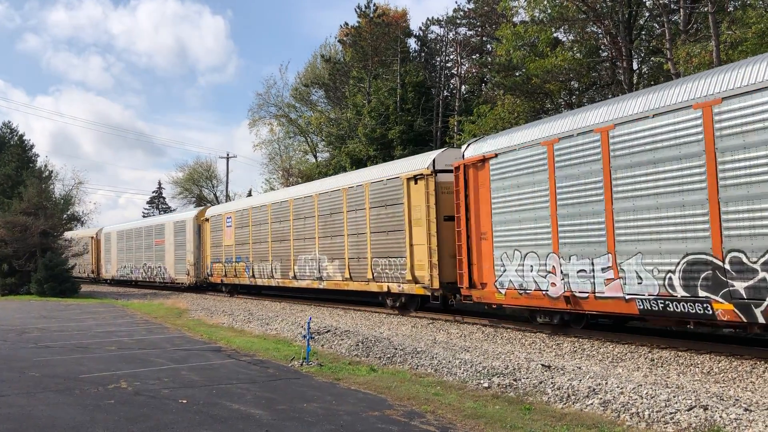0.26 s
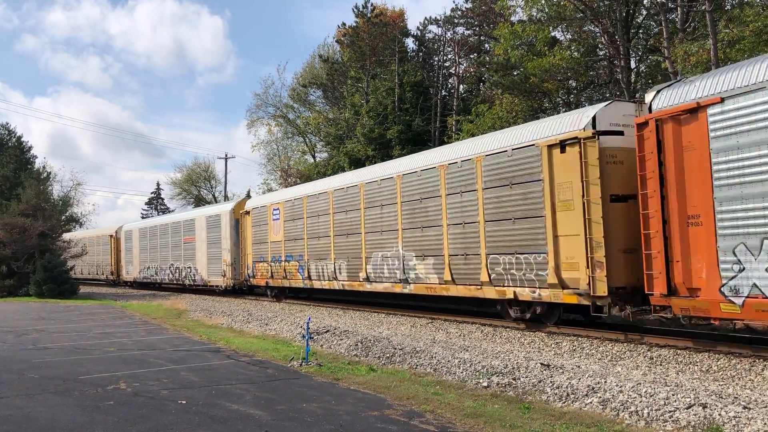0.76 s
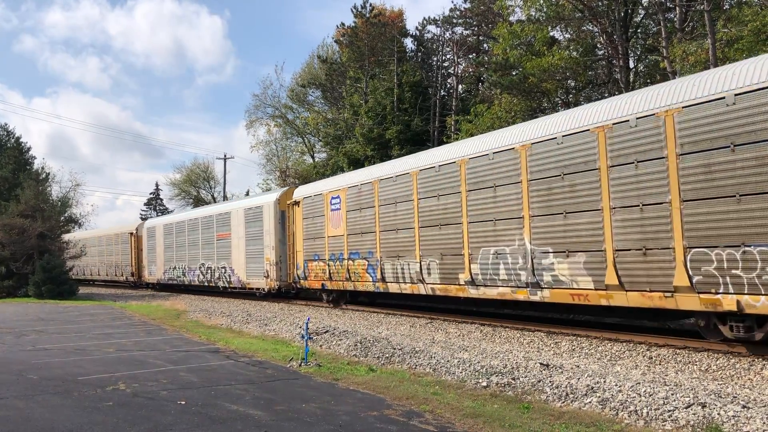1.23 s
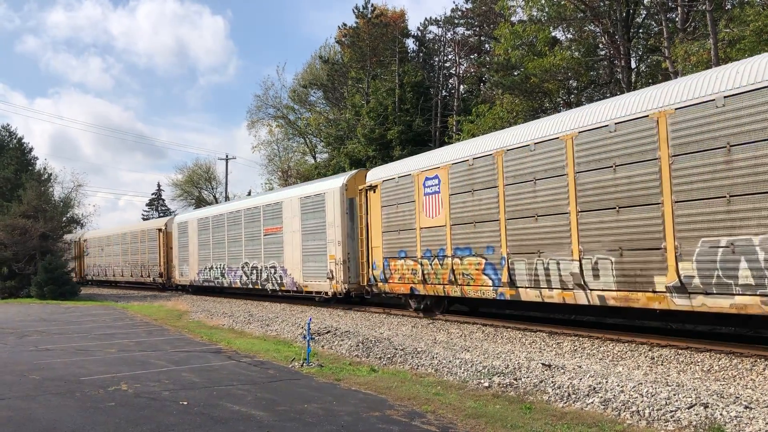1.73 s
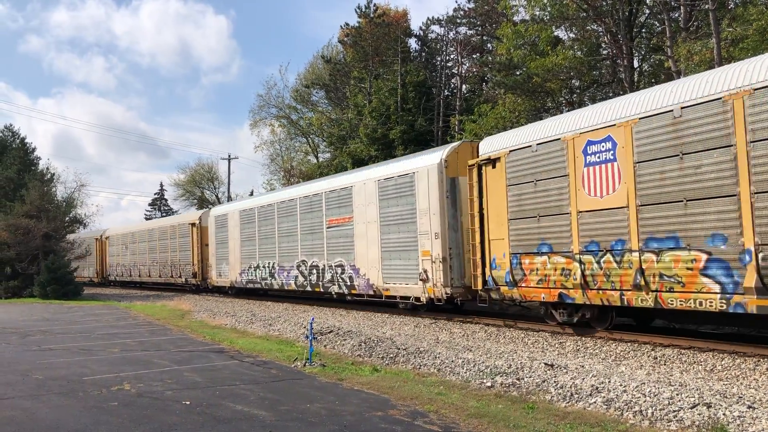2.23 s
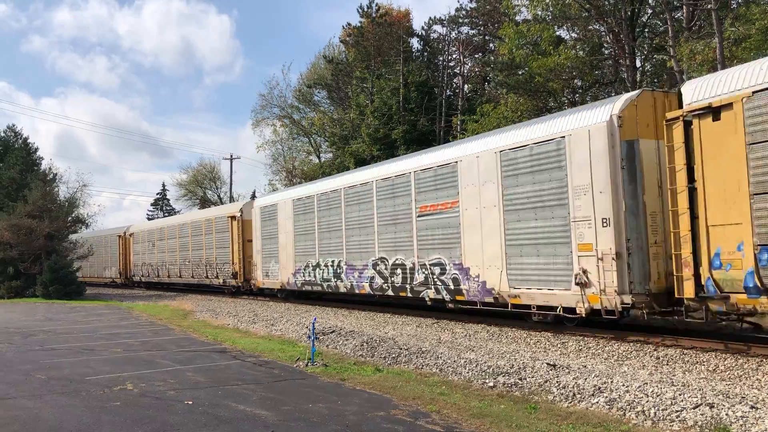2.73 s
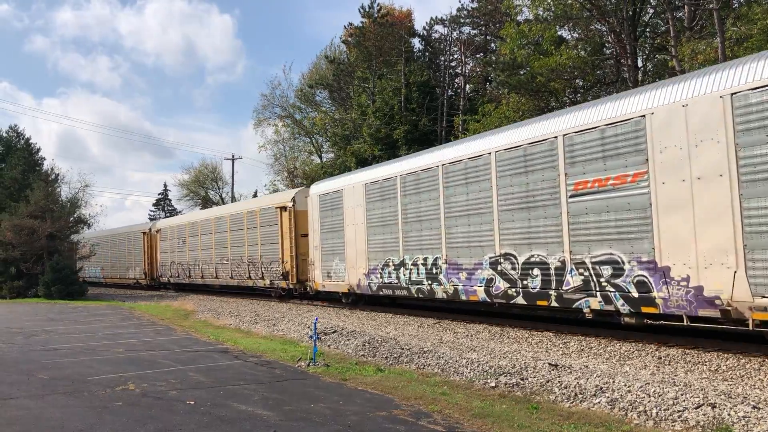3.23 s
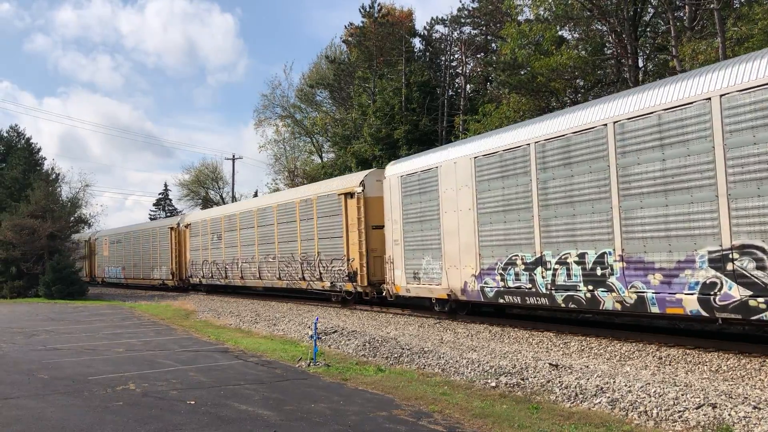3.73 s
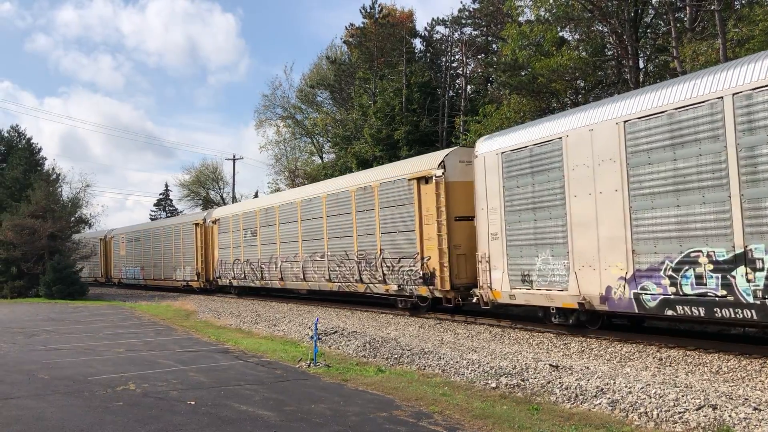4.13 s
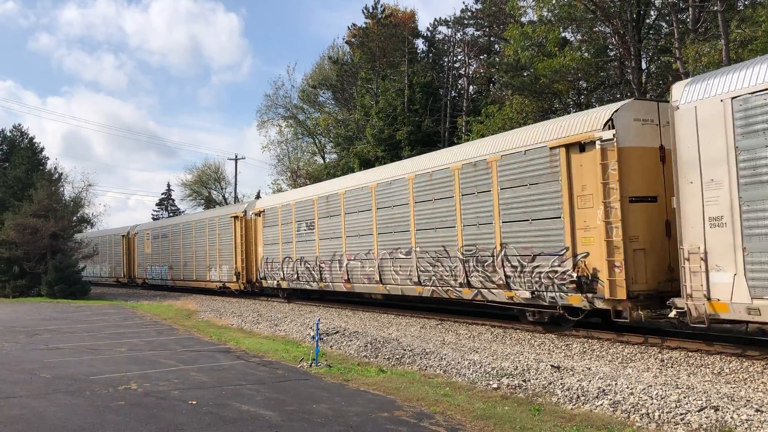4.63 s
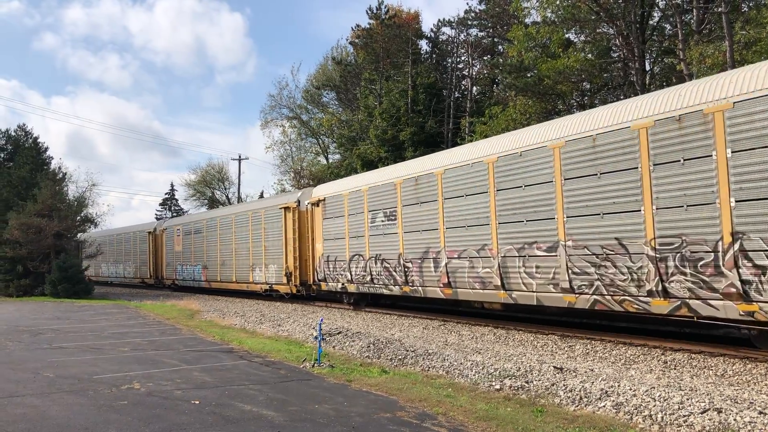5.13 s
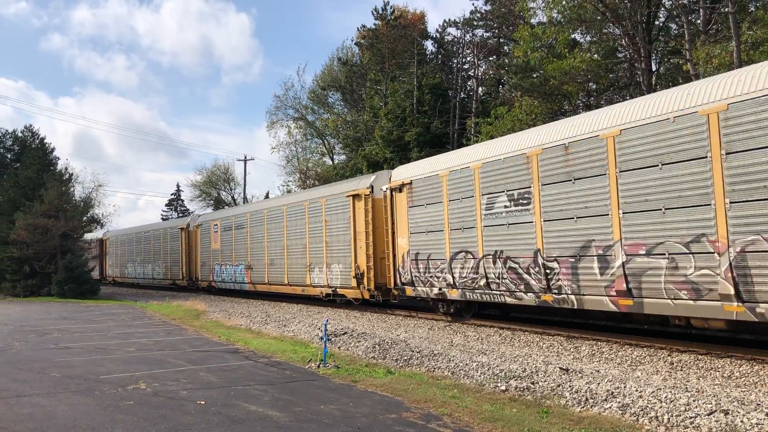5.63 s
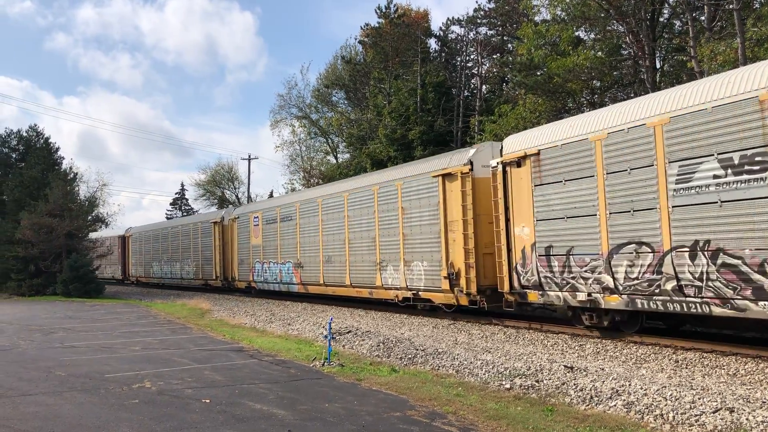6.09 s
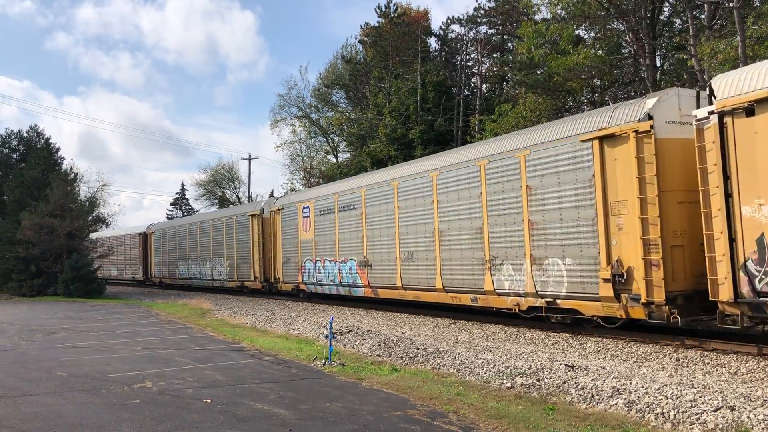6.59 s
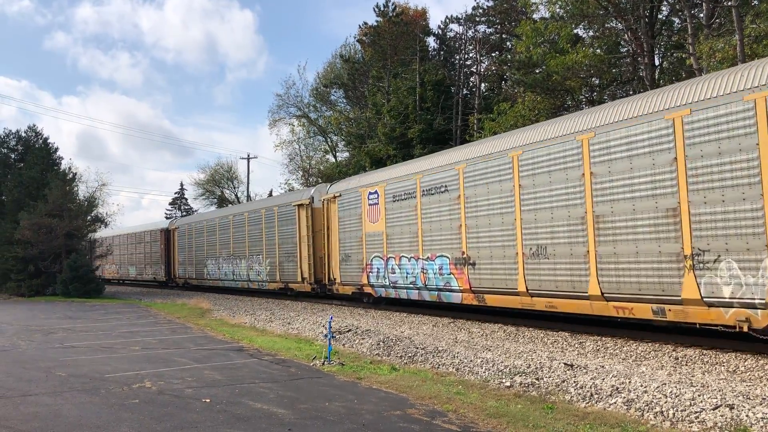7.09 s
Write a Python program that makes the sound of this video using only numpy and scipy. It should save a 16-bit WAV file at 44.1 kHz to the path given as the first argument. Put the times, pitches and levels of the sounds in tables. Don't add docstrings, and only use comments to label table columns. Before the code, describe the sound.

Steel wheels scrape and sing against the rail as empty wagons pass. Early chirps and gritty hiss lead into piercing squeals that swell in the middle, some sliding down in pitch as wheels pass. Another high whistle takes over, then everything thins to faint squeaks over rolling and rumble. Recorded outdoors near the track with one stationary microphone, identical in both channels, without obvious reverberation.

```python
import sys
import numpy as np
from scipy import signal
from scipy.fft import rfft, irfft, next_fast_len
from scipy.io import wavfile
from scipy.ndimage import uniform_filter1d, map_coordinates

SR = 44100
rng = np.random.default_rng(int(sys.argv[2]) if len(sys.argv) > 2 else 0)


def dump(signal):
    limited = np.clip(np.atleast_2d(signal).T, -1, 1)
    pcm = np.round(limited * 32767).astype(np.int16)
    wavfile.write(sys.argv[1], SR, pcm)


def natural_amplitude(level_db):
    exponent = np.asarray(level_db, float) / 20
    return 10 ** exponent


N = 324135

# rest_hz, doppler_share, passing_s, bend_s
PASSING_MODES = [
    (4962, 0.0425, 3.87, 0.92),
    (8668, 0.0082, 5.24, 0.12),
    (7471, 0.0088, 3.85, 0.11),
    (7548, 0.0301, 3.59, 0.76),
    (6178, 0.0422, 5.2, 0.9),
    (3749, 0.0441, 5.24, 0.96),
    (13462, 0.0337, 3.85, 0.63),
]
# width_hz, level_db
MODE_SCRAPE = [(239.9, -4.5), (199.3, -3), (149, -1.5), (146, -1), (152, -1.5), (131, -3.5), (97, -8)]
GRIP_FALTER_DB = [3.5, 3.5, 3, 4, 5.5, 7, 4]
GRIP_SURGE_DB = [1.6, 3.4, 2.3, 2, 2.5, 4.9, 1]

# peak_s, half_length_s, level_db
FIRST_MAIN = [(.06, 0.094, -25), (.35, 0.044, -26), (.55, .2, -30.5), (1.0, 0.28, -24.5),
              (1.38, 0.083, -23.5), (1.6, 0.11, -21.5), (1.76, 0.078, -24.5), (2.2, 0.43, -24),
              (2.45, 0.15, -20), (2.66, .05, -24), (2.82, .08, -17.5), (2.98, 0.084, -14.5),
              (3.14, .07, -23.5), (3.32, .12, -17.5), (3.58, 0.1, -15), (3.78, 0.12, -15.5),
              (4.08, 0.21, -24.5), (4.45, 0.15, -34.5), (5.0, 0.75, -38)]
# peak_s, half_length_s, level_db
SECOND_THROUGH_RAIL = [(1.65, 0.13, -23), (1.97, .16, -20.5), (2.35, 0.12, -24), (2.999, .7, -28.5),
                       (4.15, 0.19, -25), (4.45, 0.12, -21), (4.85, .22, -18.5), (5.35, 0.38, -28),
                       (5.63, 0.043, -22), (5.83, 0.098, -24), (6.2, 0.71, -30), (6.7, .07, -23),
                       (7.0, .4, -33.5)]
# peak_s, half_length_s, level_db
FIRST_THROUGH_RAIL = [
    (2.15, .25, -30),
    (2.85, .4, -26),
    (3.53, .13, -20.5),
    (4.3, 0.58, -29),
    (5.0, .07, -30),
    (5.35, .1, -36),
    (5.8, .3, -43),
]
# peak_s, half_length_s, level_db
FIRST_UPPER_MODE = [
    (2.5, .5, -33.5),
    (3.6, 0.74, -29.5),
    (4.15, 0.18, -28),
]
# peak_s, half_length_s, level_db
SECOND_MAIN = [
    (3.4, .1, -33),
    (4.0, .5, -33.5),
    (5.11, 0.063, -29.5),
    (5.4, 0.11, -34),
    (5.7, 0.31, -42),
]
# peak_s, half_length_s, level_db
SECOND_LOWER_MODE = [
    (2.2, 0.11, -37),
    (2.65, .2, -35),
    (3.502, .6, -38.5),
    (4.83, .08, -32),
    (5.02, 0.11, -26),
    (5.3, .25, -41),
]
# peak_s, half_length_s, level_db
FIRST_TOP_MODE = [
    (3.2, .1, -31),
    (3.42, .08, -41),
    (3.92, 0.12, -22),
]

# start_s, end_s, pitch_hz, glide_hz, level_db
CHIRPS = [(0, 0.1, 7670, -5, -29), (0, 0.15, 13300, -100, -31), (0, 0.6, 14247, 5, -39),
          (0, 0.3, 13631, -10, -32), (0.1, 0.26, 3930, -5, -25.5), (0.1, 0.45, 15278, 0, -35),
          (0.3, 0.5, 13164, -52, -32), (0.3, 0.47, 4000, -25, -28), (0.56, 0.85, 3880, -17, -25),
          (0.65, 0.8, 14830, -51, -35), (0.9, 1.2, 13626, -10, -38), (0.95, 1.7, 8418, -51, -53),
          (1.25, 1.57, 8900, -100, -26.5), (1.26, 1.35, 6350, 10, -28.5), (1.6, 2.2, 13632, -1, -33),
          (1.33, 1.45, 3600, -12, -32.5), (1.4, 1.6, 3570, -30, -28), (1.5, 1.62, 6411, -64, -31),
          (1.66, 1.73, 4250, 8, -29.5), (1.7, 1.92, 8379, -79, -36), (1.7, 1.9, 7300, -42, -33),
          (3.203, 4.3, 8830, -20, -34), (3.438, 3.514, 2764, 10, -36), (3.5, 4.2, 10023, -100, -41),
               (3.7, 3.9, 15630, -140, -36), (3.9, 4.02, 14526, -100, -36), (4.301, 5.1, 8720, 0, -35),
               (4.4, 5, 1540, -16, -48), (4.86, 4.98, 1510, -4, -38), (4.743, 4.82, 2700, 11, -35),
               (5.035, 5.12, 4990, -20, -35), (5.03, 5.3, 14410, -140, -40), (6.5, 7.2, 8950, 5, -36),
               (6.435, 6.747, 6810, 3, -31.5), (6.649, 7.35, 5300, -52.5, -41), (6.7, 6.9, 11809, -29, -37),
               (6.797, 7.35, 5280, -25.5, -48), (6.95, 7.2, 14744, -28, -35),
               (7.15, 7.45, 14617, -60.5, -33),
          (0.783, 0.863, 3870, -8, -38), (1.493, 1.55, 3280, -30, -30), (3.3, 3.703, 3830, -23, -38),
                (3.85, 4.25, 3900, -35, -39), (4.344, 4.39, 2660, 0, -33.5), (3.76, 3.8, 2700, 0, -40),
                (3.898, 3.95, 2690, 0, -38), (4.02, 4.06, 2690, 2, -37.5), (4.19, 4.23, 2690, 5, -34),
                (4.51, 4.555, 2680, 2, -37), (6.5, 6.586, 10300, 6, -35), (6.601, 7.6, 4050, -20, -46.5),
                (6.697, 7.3, 9600, -20, -38), (6.9, 7.607, 5640, 6, -43), (4.66, 4.7, 2690, -2, -41),
                (4.884, 4.93, 2690, 9, -34)]

# time_s, hiss_db
FLANGE_PRESSURE = [(0.0, -22.5), (.72, -21.5), (.78, -25.5), (1.19, -25), (1.28, -24.5), (2.7, -23.5),
                   (3.0, -24.5), (3.16, -23), (3.48, -22.5), (3.6, -26), (3.78, -24), (4.23, -23.5),
                   (4.3, -30), (4.94, -26), (6.06, -35.5), (6.42, -35), (6.46, -29.5), (7.35, -30.5)]
# time_s, half_length_s, depth_db
FLANGE_LIFTS = [
    (.06, 0.022, 3),
    (0.224, 0.04, 10.5),
    (.515, 0.032, 6),
    (0.766, 0.036, 3),
    (3.554, .05, 2),
    (5.0, 0.018, -2),
    (5.9, 0.033, 2),
    (6.356, .07, 1.5),
]
# time_s, level_above_hiss_db
RIM_RINGING = [(0, -4.5), (.5, -4.5), (.85, -12), (1.3, -4), (2.7, -4), (4.2, -1.5), (5.6, -3.5),
               (6.3, -12), (7.35, -21)]
# centre_hz, width_hz, level_db
RIM_RESONANCES = [(2690, 120, 1), (3860, 98, 1.5), (5100, 300, 3.5), (6250, 590, -1.5), (7510, 330, 1),
                  (8470, 260, -5.5), (10000, 230, -2), (11050, 230, -2)]
# frequency_hz, density_db_per_hz
HISS_SPECTRUM = [(2500, -9), (4000, -4), (6500, -7.5), (9000, -0.5), (12000, -1), (14000, -4), (16000, -10)]
# frequency_hz, density_db_per_hz
AIR_SPECTRUM = [(6000, -42), (10000, -7), (13000, -5.5), (16000, 2)]
# frequency_hz, density_db_per_hz
SCUFF_SPECTRUM = [(900, -21), (1700, -5.5), (2700, -0.5), (4200, -2.5), (7000, -9), (10000, -14)]
# time_s, centre_hz, level_db
FLANGE_CATCHES = [
    (.262, 7200, -15),
    (1.176, 7700, -35),
    (1.226, 8000, -21),
    (1.67, 8400, -16),
    (5.04, 7000, -18),
    (5.47, 7300, -23),
]

# time_s, rolling_db
ROLLING_LEVEL = [(0.0, -27.5), (0.57, -25.5), (0.63, -26.5), (1.08, -26), (3.01, -34), (3.09, -32),
                 (3.5, -33.5), (3.54, -38.5), (4.07, -34), (5.85, -31), (6.39, -27.5), (7.35, -28)]
# peak_s, half_length_s, level_db
WAGON_BOOMS = [
    (.28, .1, -24),
    (1.2, 0.39, -26.5),
    (1.75, .3, -22),
    (2.4, 0.33, -28),
    (3.35, 0.22, -31.5),
    (5.9, .35, -27.5),
]
# frequency_hz, density_db_per_hz
THROB_SPECTRUM = [(18, -50), (30, -30), (45, -16), (55, -3.5), (62, 1), (70, -0.5), (90, -4.5),
                  (130, -11.5), (200, -44)]
# frequency_hz, density_db_per_hz
RUMBLE_SPECTRUM = [(30, -60), (60, -7), (110, -4.5), (180, -0.5), (290, -1.5), (400, -10.5), (600, -37.5)]
# frequency_hz, density_db_per_hz
ROLLING_SPECTRUM = [(60, -60), (250, -41), (420, -3), (700, 1.5), (1000, -4), (1500, -11), (2200, -13),
                    (4000, -29.5)]

SWELL_DROP_DB, SWELL_SHAPE = 8, 2.2
WHEEL_TURN_HZ, BENT_PEAK_S, BENT_HALF_S, BENT_DB = 6.59, 5.52, 0.71, 3
STEP_S = .002


def squeals():
    out = np.zeros(N)
    swell_tables = [FIRST_MAIN, SECOND_THROUGH_RAIL, FIRST_THROUGH_RAIL, FIRST_UPPER_MODE,
                    SECOND_MAIN, SECOND_LOWER_MODE, FIRST_TOP_MODE]
    modes = zip(PASSING_MODES, swell_tables, MODE_SCRAPE, GRIP_FALTER_DB, GRIP_SURGE_DB)
    for (rest_hz, share, passing_s, bend_s), rows, (width_hz, halo_db), falter_db, surge_db in modes:
        grip = swells(rows)
        lasting = uniform_filter1d(grip, size=SR // 2)
        heard = np.flatnonzero(lasting > 1e-5)
        along = (heard / SR - passing_s) / bend_s
        hz = rest_hz * (1 - share * along / np.sqrt(1 + along ** 2))

        uneven_grip = (grip * natural_amplitude(surge_db * wobble(22)))[heard]
        line = uneven_grip * singing(hz, flutter_db=falter_db, drift_hz=3.92)

        scrape_real = wobble(2 * width_hz, size=len(hz))
        scrape_imag = wobble(2 * width_hz, size=len(hz))
        scrape = unit(scrape_real + 1j * scrape_imag)
        echoed_hz = (hz + rest_hz) / 2
        carrier = singing(echoed_hz, flutter_db=3.5, drift_hz=30.08)
        halo = natural_amplitude(halo_db) * lasting[heard] * scrape * carrier
        out[heard] += np.real(line + halo)
    return out


def chirps(rows, smear):
    out = np.zeros(N + SR)
    for start_s, end_s, hz, glide_hz, level_db in rows:
        u = np.linspace(0, 1, int((end_s - start_s) * SR) + 900)
        attack = np.clip(u / 0.061, 0, 1)
        release = np.clip((1 - u) / 0.56, 0, 1) ** 0.85
        scrape_real = wobble(.04 * hz, size=len(u))
        scrape_imag = wobble(.04 * hz, size=len(u))
        scrape = smear * (scrape_real + 1j * scrape_imag)
        tone = singing(hz + glide_hz * u, flutter_db=5, drift_hz=.0012 * hz)
        chirp = natural_amplitude(level_db + .2) * attack * release * np.real(tone * (1 + scrape))
        out[max(int(start_s * SR), 0):][:len(u)] += chirp
    return out[:N]


def far_wheels(count):
    when, life, mode, strength = rng.random((count, 4)).T
    start_s = when * N / SR
    end_s = start_s + 0.066 + 0.41 * life ** 2
    hz = 3000 + 12600 * mode ** .7
    glide_hz = -.004 * hz * strength
    level_db = -16 + 4.4 * strength
    rows = np.transpose([start_s, end_s, hz, glide_hz, level_db])
    return natural_amplitude(-30 + .8 * eased(.6)) * chirps(rows, smear=.15)


def flanges():
    hiss_db, ring_db = pressure(), curve(RIM_RINGING)
    air_db = -24.5 + 0.65 * eased(0.14)
    scuff_db = -32 + 0.79 * eased(0.65) + 0.69 * nearness()
    chatter = wobble(14)

    hiss_gain = natural_amplitude(hiss_db + 2.0 + 1.2 * chatter + 1.4 * wobble(60))
    hiss = hiss_gain * rush(slope(HISS_SPECTRUM), patchy_db=1.5)
    ring_gain = natural_amplitude(hiss_db + ring_db + 2.5 + 0.52 * chatter)
    ring = ring_gain * rush(rim_response, patchy_db=3.5)
    air = natural_amplitude(air_db + .4 * chatter) * rush(slope(AIR_SPECTRUM), patchy_db=-1.5)
    scuff_gain = natural_amplitude(scuff_db + 1.0 * chatter + 0.62 * wobble(6.5))
    scuff = scuff_gain * rush(slope(SCUFF_SPECTRUM), patchy_db=3.0)
    return hiss + ring + air + scuff


def rim_response(hz):
    total = 0
    for centre_hz, width_hz, level_db in RIM_RESONANCES:
        detuning = np.abs(centre_hz * centre_hz - hz * hz + 1j * hz * width_hz)
        total = total + natural_amplitude(level_db) * hz * width_hz / detuning
    return total ** 2


def pressure():
    beat = np.cos(2 * np.pi * WHEEL_TURN_HZ * (np.arange(N) / SR - BENT_PEAK_S))
    lifted_db = smooth(sum(db * np.exp(-bell(s, half_s)) for s, half_s, db in FLANGE_LIFTS))
    bent_db = BENT_DB * smooth(np.exp(-bell(BENT_PEAK_S, BENT_HALF_S)))
    return curve(FLANGE_PRESSURE) - lifted_db + bent_db * beat


def eased(over_s):
    return uniform_filter1d(pressure(), size=int(over_s * SR)) - pressure().mean()


def catches():
    out, t = np.zeros(N + SR), np.arange(SR // 10) / SR
    for start_s, hz, level_db in FLANGE_CATCHES:
        band = signal.butter(2, [hz * .82, hz * 1.26], "bandpass", fs=SR, output="sos")
        spit = unit(signal.sosfilt(band, rng.standard_normal(len(t))))
        envelope = natural_amplitude(level_db - 60 * t / 0.15) * (1 - np.exp(-t / 0.00075))
        out[int(start_s * SR):][:len(t)] += envelope * spit
    return out[:N]


def wagons():
    boom, near_db = swells(WAGON_BOOMS), nearness()
    throb_gain = np.hypot(boom, natural_amplitude(-30.5 + 0.87 * near_db)) * natural_amplitude(0.25 * wobble(9.9))
    throb = throb_gain * rush(slope(THROB_SPECTRUM), patchy_db=-0.6)
    rumble_gain = np.hypot(natural_amplitude(-7.5) * boom, natural_amplitude(-26.5 + 0.74 * near_db)) * natural_amplitude(.8 * wobble(6))
    rumble = rumble_gain * rush(slope(RUMBLE_SPECTRUM), patchy_db=0.35)
    rolling_gain = natural_amplitude(curve(ROLLING_LEVEL) + .3 + 0.93 * wobble(7.8))
    rolling = rolling_gain * rush(slope(ROLLING_SPECTRUM), patchy_db=1.3)
    return throb + rumble + rolling


def nearness():
    level_db = curve(ROLLING_LEVEL)
    return level_db - level_db.mean()


def singing(hz, flutter_db, drift_hz):
    pitch_hz = hz + drift_hz * wobble(30, size=len(hz))
    falter = np.minimum(wobble(40, size=len(hz)), .6)
    phase = 2 * np.pi * np.cumsum(pitch_hz) / SR
    return np.sqrt(2) * natural_amplitude(flutter_db * falter) * np.exp(1j * phase)


def swells(rows):
    power = 0
    for peak_s, half_s, level_db in rows:
        swell_db = level_db - SWELL_DROP_DB * bell(peak_s, half_s)
        power = power + natural_amplitude(2 * np.maximum(swell_db, -200))
    return smooth(np.sqrt(power))


def bell(peak_s, half_s):
    return np.abs((np.arange(0, N / SR, STEP_S) - peak_s) / half_s) ** SWELL_SHAPE


def smooth(steps):
    return np.interp(np.arange(N) / SR / STEP_S, np.arange(len(steps)), steps)


def curve(rows):
    time_s, values = np.transpose(rows)
    return np.interp(np.arange(N) / SR, time_s, values)


def wobble(rate_hz, size=N):
    knots = rng.standard_normal(int(size * rate_hz / SR) + 4)
    return map_coordinates(knots, [np.arange(size) * rate_hz / SR], order=1)


def rush(response, patchy_db):
    z = signal.stft(rng.standard_normal(N), nperseg=512)[2]
    field = uniform_filter1d(rng.standard_normal(z.shape), 8, 0)
    field = uniform_filter1d(field, 10, 1)
    noise = signal.istft(z * natural_amplitude(patchy_db * unit(field)), nperseg=512)[1][:N]
    m = next_fast_len(N + 8192)
    hz = np.fft.rfftfreq(m, 1 / SR) + 1
    return unit(irfft(rfft(noise, m) * response(hz), m)[:N])


def slope(points):
    f, db = np.transpose(points)
    return lambda hz: natural_amplitude(np.interp(np.log(hz), np.log(f), db))


def unit(x):
    return x / np.sqrt(np.mean(np.abs(x) ** 2) + 1e-20)


def scene():
    short_squeals = chirps(CHIRPS, smear=0.61)
    wheels = squeals() + short_squeals + far_wheels(count=340)
    train = wheels + flanges() + catches() + wagons()
    return np.array([train, train])


def roll_off(x):
    return signal.sosfilt(signal.butter(12, 16950, fs=SR, output="sos"), x)


def record(dry):
    held = dry / (1 + np.abs(dry / 0.64) ** 4) ** (1 / 4)
    in_band = np.fft.rfftfreq(N, 1 / SR) < 15760
    kept = irfft(rfft(held) * in_band, N)
    return roll_off(kept)


dry = scene()
out = record(dry)
dump(out)
```